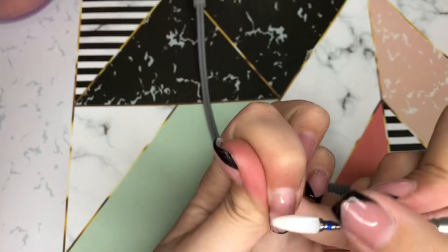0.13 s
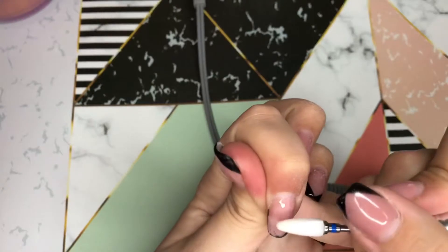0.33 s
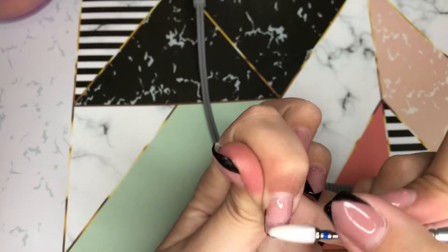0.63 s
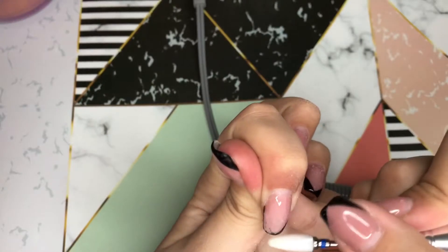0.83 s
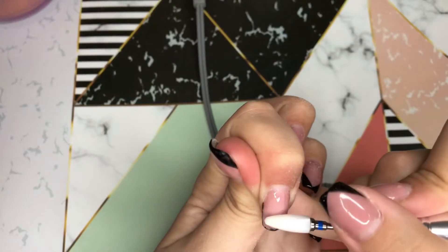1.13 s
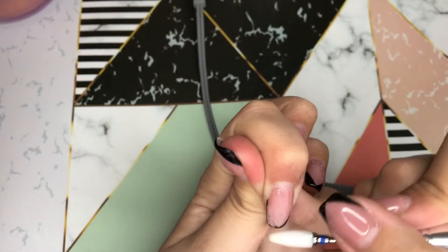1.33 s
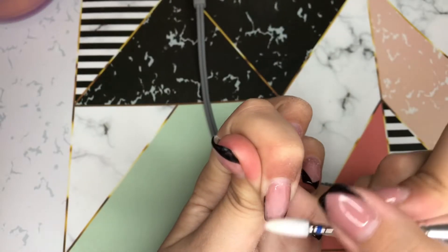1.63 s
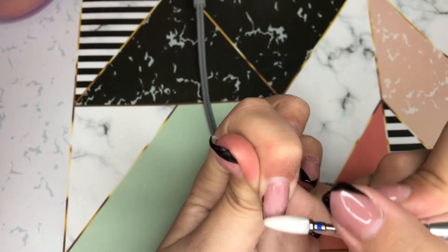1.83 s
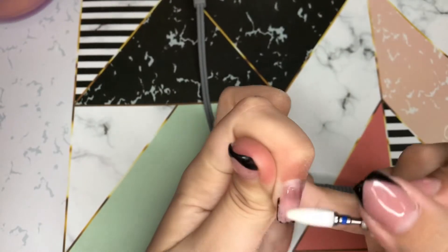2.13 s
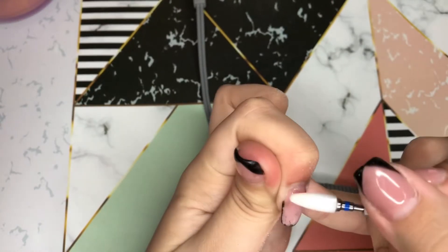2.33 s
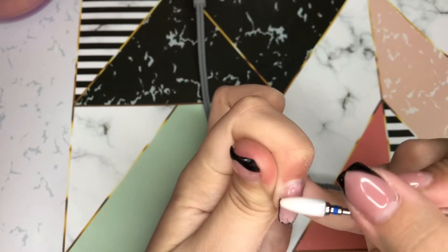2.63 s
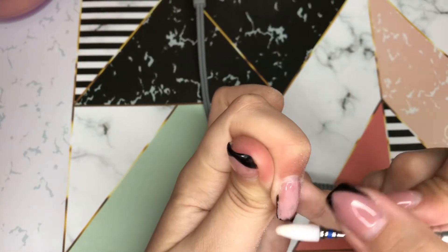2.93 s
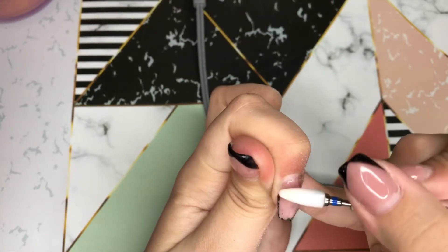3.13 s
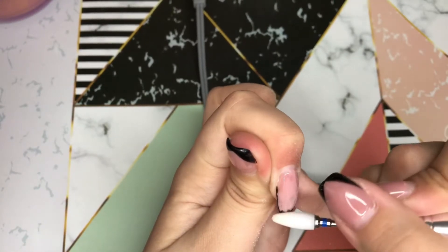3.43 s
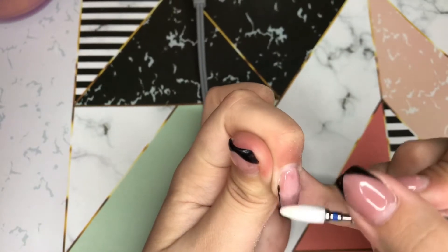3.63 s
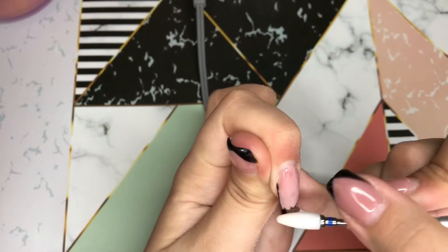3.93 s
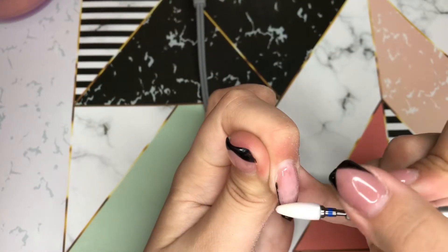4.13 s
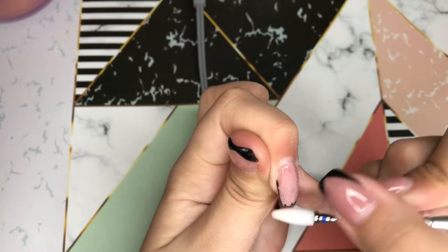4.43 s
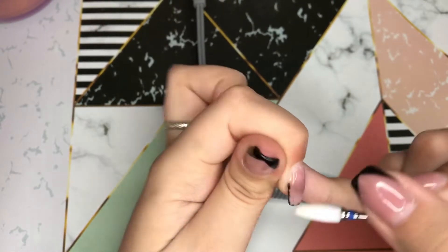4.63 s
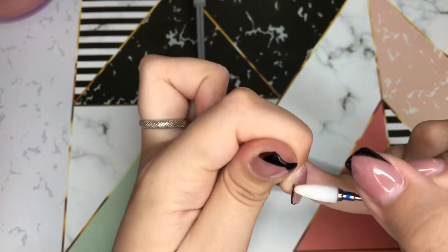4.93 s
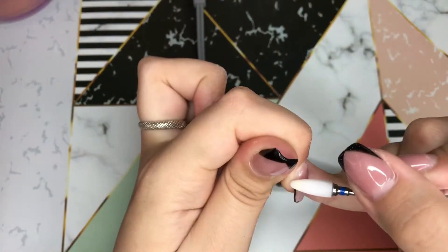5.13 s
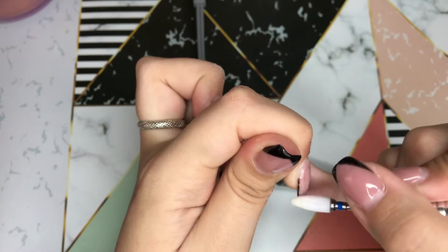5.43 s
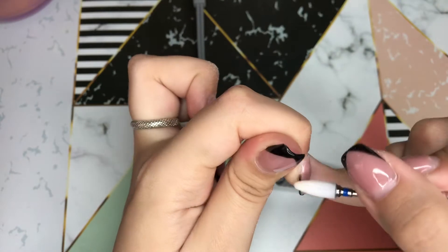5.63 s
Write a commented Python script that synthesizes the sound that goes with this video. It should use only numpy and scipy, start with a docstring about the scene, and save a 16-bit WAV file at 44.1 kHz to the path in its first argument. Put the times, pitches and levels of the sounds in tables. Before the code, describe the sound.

Close up in a quiet indoor room, an electric nail file whirs with a fine, high buzz. The bit grinds on a fingernail in quick, uneven passes, each a scratchy squeal with a hiss of dust. The pitch dips with every press, deepest on the second one, then recovers. Light clicks from the handpiece come in some gaps, and the motor keeps running to the end.

```python
"""Electric nail drill in a quiet room.

The small motor hums on shaft orders and its brushes tick five times a turn. Each stroke on the nail
brakes the shaft, makes the flutes of the bit sing and throws a rasp of dust. The handpiece taps lightly
between strokes. The walls add a short tail over a low room rumble."""
import sys
import numpy as np
from scipy import signal
from scipy.fft import rfft, irfft, next_fast_len
from scipy.io import wavfile
from scipy.ndimage import uniform_filter1d, map_coordinates

SR = 44100
rng = np.random.default_rng(int(sys.argv[2]) if len(sys.argv) > 2 else 0)


def store_wav(level_fs):
    """Save 16-bit WAV to argv[1]."""
    pcm = np.round(np.clip(np.atleast_2d(level_fs), -1, 1) * 32767)
    wavfile.write(sys.argv[1], SR, pcm.T.astype(np.int16))


N = 255339


def amp(db):
    return 10 ** (np.asarray(db) / 20)


def unit_rms(x):
    return x / np.sqrt(np.mean(x ** 2) + 1e-20)


def curve(rows, column):
    """One column of timed rows, a value per sample."""
    rows = np.array(sorted(row[:column + 1] for row in rows))
    return np.interp(np.arange(N) / SR, rows[:, 0], rows[:, column])


def wobble(rate_hz):
    """Smooth random curve through rate_hz Gaussian knots a second."""
    knots = rng.standard_normal(int(N * rate_hz / SR) + 4)
    return map_coordinates(knots, [np.arange(N) * rate_hz / SR])


def coloured(x, spectrum):
    """Minimum-phase filter through (Hz, dB) points on a log frequency axis."""
    hz, db = np.transpose(spectrum)
    gain = amp(np.interp(np.log(np.fft.rfftfreq(4096, 1 / SR) + 1), np.log(hz + 1), db))
    cepstrum = irfft(np.log(gain + 1e-6))
    cepstrum[1:2048] *= 2
    cepstrum[2049:] = 0
    impulse = irfft(np.exp(rfft(cepstrum)))
    size = next_fast_len(N + 8192)
    return irfft(rfft(x, size) * rfft(impulse, size), size)[:N]


FULL_SPEED_HZ, SPIN_UP_TAU_S = 114, .095
# Braked shaft, one list per stroke. Each row: time in seconds, shaft rate in Hz.
BRAKED_SPEED = [
    [(0, 114.2), (.47, 114.4), (.54, 108.5), (.62, 103.5), (.67, 105.2), (.76, 100.8)],
    [(.98, 113), (1.06, 101.5), (1.1, 94), (1.18, 70), (1.22, 61), (1.255, 58), (1.29, 66), (1.35, 94.4)],
    [(1.53, 112.6), (1.58, 108.3), (1.62, 101.5), (1.64, 100.4)],
    [(1.85, 112), (1.925, 97.5)],
    [(2.52, 112.6), (2.63, 103.8), (2.74, 104.6), (2.83, 97.5), (2.85, 97.7)],
    [(3.17, 114.8), (3.23, 108.5), (3.295, 99.3), (3.43, 99.2)],
    [(3.74, 115.4), (3.84, 101)],
    [(4.105, 115), (4.19, 99.9), (4.21, 100.2)],
    [(4.39, 113.7), (4.44, 111.9)],
    [(5.08, 116), (5.14, 111.5), (5.24, 94.5), (5.29, 89), (5.37, 98.5), (5.45, 105.9)],
    [(5.77, 115.4), (5.79, 115.2)],
]
def shaft():
    """Rate in Hz and angle in radians. The bit brakes the motor; freed, it spins up again."""
    t = np.arange(N) / SR
    speed_hz = curve(sum(BRAKED_SPEED, []), column=1)
    for before, after in zip(BRAKED_SPEED, BRAKED_SPEED[1:]):
        (freed_s, slow_hz), (touch_s, fast_hz) = before[-1], after[0]
        gap = (t > freed_s) & (t < touch_s)
        rise = np.expm1((freed_s - t[gap]) / SPIN_UP_TAU_S)
        rise /= np.expm1((freed_s - touch_s) / SPIN_UP_TAU_S)
        speed_hz[gap] = slow_hz + (fast_hz - slow_hz) * rise
    speed_hz = uniform_filter1d(speed_hz, size=441)
    return speed_hz, 2 * np.pi * np.cumsum(speed_hz) / SR


# Shaft orders from 5 up, before speed scaling. Each row: level in dB below full speed, level in dB at it.
HUM_ORDERS = [(-93, -70), (-64.0, -70.5), (-67.5, -63), (-57, -63.5), (-49.5, -59), (-64, -60.5),
              (-57.5, -66), (-55.5, -69), (-62.5, -62.5), (-57.5, -68), (-51.5, -60.5), (-66, -78),
              (-83, -82), (-62, -54), (-52.5, -48.5), (-41.5, -52.5), (-46, -69), (-65.5, -69), (-52, -70),
              (-50, -79), (-56, -94), (-86, -79), (-84, -64), (-68, -85), (-88, -79), (-66, -95)]
# Motor whirr. Each row: frequency in Hz, relative level in dB.
WHIRR_SPECTRUM = [(350, -58), (600, -25.5), (810, -15.5), (1950, -13), (2230, 1), (2550, -15.5), (3300, -8),
                  (4290, -45), (7260, -120)]
def motor_hum(speed_hz, angle):
    """Shaft orders; at full speed their pattern changes, they grow unsteady and the whirr rises."""
    at_full = np.clip((speed_hz - FULL_SPEED_HZ) / .42 + .5, 0, 1)
    orders = np.zeros(N)
    for order, (slow_db, full_db) in enumerate(HUM_ORDERS, 5):
        sway_db = (.7 + at_full) * wobble(14)
        gain = (1 - at_full) * amp(slow_db) + at_full * amp(full_db)
        gain *= (speed_hz / FULL_SPEED_HZ) ** (.8 * order)  # high orders fade first on slowing
        phase = order * angle + rng.uniform(0, 2 * np.pi) + (.15 + .45 * at_full) * wobble(20)
        orders += gain * amp(sway_db) * np.sin(phase)
    whirr_db = -53.5 + 6.4 * at_full + 3.4 * wobble(9)
    whirr = amp(whirr_db) * unit_rms(coloured(rng.standard_normal(N), WHIRR_SPECTRUM))
    return np.sqrt(2) * orders + whirr


def wear(turns, renewal_hz):
    """Roughness of a turning surface: repeats each turn while it is gradually renewed."""
    age = np.cumsum(renewal_hz) / SR
    marks = rng.standard_normal((int(age[-1]) + 4, 360))
    return unit_rms(map_coordinates(marks, [age, turns % 1 * 360], mode="grid-wrap"))


# Ticks of one turn. Each row: position as a share of the turn, relative level in dB.
COMMUTATOR_TICKS = [(0, -2.5), (.27, 3.5), (.51, 3), (0.713, -3.5), (0.799, -11)]
# Brush loudness at full speed. Each row: time in seconds, level in dB before a fixed lift.
BRUSH_LEVELS = [(0, -39.5), (.45, -41), (.8, -39.5), (2.0, -39), (2.5, -38.5), (4.25, -39.5), (5.05, -37.5),
                (5.5, -38.5), (5.79, -38)]
# Housing response. Each row: frequency in Hz, relative gain in dB.
HOUSING_RESPONSE = [(1710, -36.5), (2900, -12), (3250, -17), (3510, -9.5), (4070, -12), (4400, -5.5),
                    (5030, -7), (6090, -3), (7220, -7.5), (7740, -17), (9640, -9.5), (10600, -18.5),
                    (11700, -14), (13200, -14.5), (15700, -18)]
def brushes(speed_hz, angle, lift_db=4, db_per_hz=.06, sway_db=.8):
    """Brushes tick on the commutator gaps; after each tick they rub on worn copper and spark."""
    turns = angle / (2 * np.pi)
    whole_turns = np.arange(1, int(turns[-1]) - 1)
    ticks = np.zeros(N + 1)
    for share, db in COMMUTATOR_TICKS:
        jitter, strength = rng.standard_normal((len(whole_turns), 2)).T
        position = np.interp(whole_turns + share, turns, np.arange(N)) + .8 * jitter
        sample, fraction = position.astype(int), position % 1
        gain = amp(db + 1.3 * strength + 1.5 * wobble(5)[sample])
        ticks += np.bincount(sample, gain * (1 - fraction), N + 1)
        ticks += np.bincount(sample + 1, gain * fraction, N + 1)
    decay = np.exp(-np.arange(400) / (.0012 * SR))
    rub_envelope = unit_rms(np.convolve(ticks, decay)[:N]) + .7
    copper = wear(turns, renewal_hz=np.where(speed_hz > FULL_SPEED_HZ, 24, 7))
    sparks = .8 * rng.standard_normal(N)
    source = .55 * unit_rms(ticks[:N]) + unit_rms(rub_envelope * (copper + sparks))
    level_db = curve(BRUSH_LEVELS, column=1) + lift_db + db_per_hz * (speed_hz - FULL_SPEED_HZ)
    return amp(level_db + sway_db * wobble(12)) * unit_rms(coloured(source, HOUSING_RESPONSE))


# Wall response. Each row: frequency in Hz, gain in dB.
WALL_RESPONSE = [(500, 6), (4000, -2), (12000, -12)]
def walls(x, t60_s=.2):
    """Short diffuse reflection from table and walls, which swallow the treble."""
    t = np.arange(SR // 4) / SR
    tail = unit_rms(rng.standard_normal(len(t)) * amp(-60 * t / t60_s)) / np.sqrt(len(t))
    return coloured(signal.fftconvolve(x, tail)[:N], WALL_RESPONSE)


# Room rumble. Each row: frequency in Hz, relative level in dB.
ROOM_SPECTRUM = [(12, -44), (20, -26), (59, 3), (155, -7), (202, -5), (487, -15.5), (560, -22), (730, -20),
                 (1230, -120)]
def room_tone(level_db=-60.5):
    """Low, steady rumble of the room."""
    return amp(level_db + .7 * wobble(5.17)) * unit_rms(coloured(rng.standard_normal(N), ROOM_SPECTRUM))


LAND_S, LIFT_S = .006, .008
# Bit on the nail, one list per stroke. Each row: time in seconds, flute drive in dB,
# fine over coarse flutes in dB, rasp drive in dB.
NAIL_STROKES = [
    [(0.472, -28.5, 3, -38), (0.498, -23, -11, -28), (0.522, -29.5, -10, -31), (0.544, -21.5, -16, -28),
     (0.584, -24.5, 0, -31.5), (0.61, -21, 20, -24), (0.656, -29, 2, -35), (0.678, -26.5, 5, -27.5),
     (0.758, -18.5, 22, -30.5), (0.77, -32, 10, -37)],
    [(0.985, -25.5, -12, -26), (1.047, -20.5, 10, -30), (1.095, -17.5, 18.5, -27.5), (1.2, -24.5, 25, -24),
     (1.266, -35, 15, -24.5), (1.288, -29.5, 17, -27), (1.31, -34, -2, -30)],
    [(1.532, -26.5, 5, -32), (1.568, -32.5, 18, -29.5), (1.598, -20, -11, -25), (1.63, -27, 4, -27),
     (1.66, -33, -2, -30.5)],
    [(1.857, -26.5, 1, -25), (1.889, -24, -3, -26), (1.921, -27, 5, -24.5), (1.94, -31, -4, -27)],
    [(2.515, -36.5, 3, -44), (2.581, -31, 8, -35), (2.621, -30, -6, -29), (2.66, -34, -5, -32.5),
     (2.735, -29, -8, -28), (2.784, -24, 12, -24.5), (2.824, -24, 13, -25.5), (2.858, -40, -2, -32)],
    [(3.173, -35, -6, -36), (3.229, -29.5, 11, -31), (3.247, -30, -5, -28.5), (3.281, -22, 10, -27),
     (3.31, -28, 4, -26.5), (3.406, -31, 13, -26), (3.447, -31.5, 0, -31)],
    [(3.734, -30, 2, -33.5), (3.78, -24, 9.5, -26), (3.8, -31, 7, -26), (3.83, -21.5, 20, -24.5),
     (3.856, -32, 1, -31)],
    [(4.108, -27, -4, -32), (4.134, -24, 17, -26.5), (4.156, -27, 3, -29.5), (4.178, -19.5, 26, -25.5),
     (4.211, -21.5, 9, -27.5)],
    [(4.394, -35, -0.5, -32), (4.402, -25, -1, -28), (4.425, -26, 1, -30.5)],
    [(5.074, -28.5, 11, -37), (5.12, -32.5, 3, -33), (5.146, -28.5, 20, -34.5), (5.2, -35, 5, -32),
     (5.264, -25, 24, -30), (5.298, -29.5, 5, -28), (5.329, -22.5, 20, -30.5), (5.425, -23, 19, -32),
     (5.47, -40, 8, -41)],
    [(5.775, -41, 0, -37), (5.789, -43, 2.5, -33)],
]
def stroke_curve(column):
    """One stroke control per sample; the drives fall silent while the bit is off the nail."""
    landings = [(rows[0][0] - LAND_S, -90, rows[0][2], -90) for rows in NAIL_STROKES]
    lifts = [(rows[-1][0] + LIFT_S, -90, rows[-1][2], -90) for rows in NAIL_STROKES]
    return curve(sum(NAIL_STROKES, []) + landings + lifts, column)


def flutes(speed_hz, angle):
    """Two crossing sets of flutes sing with overtones and a sum tone. Also returns the fine set's phase."""
    drive, fine_ratio = amp(stroke_curve(column=1)), amp(stroke_curve(column=2))
    coarse_gain = drive / np.hypot(1, fine_ratio)
    fine_gain = coarse_gain * fine_ratio
    fine_phase = 20 * angle + .48 * wobble(120)
    coarse_phase = 14 * angle + .45 * wobble(120)
    harshness = amp(-16 + .28 * (FULL_SPEED_HZ - speed_hz) + 3.1 * wobble(80))  # a braked bit cuts deeper
    overtones = np.sin(2 * fine_phase + .9 * wobble(200)) + .8 * np.sin(3 * fine_phase)
    tones = fine_gain * (np.sin(fine_phase) + harshness * overtones)
    tones += coarse_gain * (np.sin(coarse_phase) + amp(-6) * np.sin(2 * coarse_phase))
    sum_gain = np.sqrt(fine_gain * coarse_gain) * amp(-6 + 3 * wobble(60))
    tones += sum_gain * np.sin(fine_phase + coarse_phase + .6 * wobble(150))
    return tones, fine_phase


# Grip, stroke by stroke. Each row: dust over rasp drive in dB at the start, the same at the end,
# landing bounce from 0 to 1, its time constant in seconds.
STROKE_GRIP = [(-9.5, 9, 0.79, 0.13), (-2, -1, 0.6, 0.043), (-2, 2.5, 0.8, 0.028), (3, 4, 0.1, .04),
               (-14, 0.5, 0.17, 0.25), (-14.5, 7, .25, .1), (5.5, 4, 0.2, 0.027), (9, 5.5, 0, .05),
               (10.5, 6.5, 0, .05), (-3, -10, 0.2, 0.72), (-6, -3, 0, .05)]
def grip():
    """Dust over rasp glides through each stroke; the bounce settles after landing."""
    t, dust_db, bounce = np.arange(N) / SR, np.zeros(N), np.zeros(N)
    for rows, (start_db, end_db, landing_bounce, settle_s) in zip(NAIL_STROKES, STROKE_GRIP):
        start_s, end_s = rows[0][0], rows[-1][0]
        landed = t > start_s - LAND_S
        dust_db[landed] = np.interp(t[landed], [start_s, end_s], [start_db, end_db])
        bounce[landed] = landing_bounce * np.exp((start_s - t[landed]) / settle_s)
    return dust_db, bounce


def runout(angle, bounce):
    """The bit is out of round: bouncing, it touches once a turn; pressed hard, it stays on the nail."""
    depth = .12 + 2.4 * np.clip(bounce, 0, 1)
    starts = np.array([round(rows[0][0] * SR) for rows in NAIL_STROKES])
    stroke_index = np.maximum(np.searchsorted(starts, np.arange(N)) - 1, 0)
    phase = angle - angle[starts][stroke_index] - 1.2 + .097 * wobble(33)
    return np.exp(depth * np.cos(phase)) / np.sqrt(np.i0(2 * depth))  # unit rms over a turn


def chips(bite, spectrum, flicker_db):
    """Noise that bursts as each tooth bites."""
    bursts = bite * amp(flicker_db * wobble(400)) * rng.standard_normal(N)
    return unit_rms(coloured(bursts, spectrum))


# Rasp and dust hiss. Each row: frequency in Hz, relative level in dB.
RASP_SPECTRUM = [(290, -73), (500, -39.5), (904, -27), (1130, -24.5), (1440, -13.5), (1780, -13),
                 (2030, -6.5), (3100, -17.5), (3500, -10), (4000, -7.5), (4700, -11.5), (8500, -17.5),
                 (11000, -26), (18700, -120)]
DUST_SPECTRUM = [(4120, -39.5), (7000, -9.5), (8460, -4), (11000, -9), (11600, -3.5), (12900, 0),
                 (15700, -11.5)]
# Response of nail and finger. Each row: frequency in Hz, gain in dB.
NAIL_RESPONSE = [(500, -21), (1100, -2.5), (2000, -0.5), (2500, 1.5), (3150, -12.5), (3750, 4), (4400, -6),
                 (5800, 1), (9000, -18)]
def grinding(speed_hz, angle):
    """Flute tones coloured by nail and finger, plus rasp and dust, all pulsed by the bit's contact."""
    tones, fine_phase = flutes(speed_hz, angle)
    dust_db, bounce = grip()
    contact = runout(angle, bounce)
    bite = (1 + .4 * np.sin(fine_phase)) * contact ** .35
    rasp_db = stroke_curve(column=3)
    rasp = amp(rasp_db - 1.05) * chips(bite, RASP_SPECTRUM, flicker_db=2)
    dust = amp(rasp_db + dust_db - .36) * chips(bite, DUST_SPECTRUM, flicker_db=1.36)
    singing = np.sqrt(2) * tones * contact * amp(-2.2 + 2.2 * wobble(70))
    return coloured(singing, NAIL_RESPONSE) + rasp + dust


# Handpiece taps. Each row: start in seconds, level in dB before a fixed lift.
HANDPIECE_TAPS = [(0.835, -35), (1.372, -30), (2.0507, -35), (2.9997, -31), (3.621, -36), (3.9608, -33),
                  (4.3172, -30)]
def taps(lift_db=10, attack_s=.00068, t60_s=.0082):
    """Each tap of the handpiece is a short dull ring of two modes."""
    out, t = np.zeros(N + 2000), np.arange(2000) / SR
    modes = np.sin(2 * np.pi * 1700 * t) + .5 * np.sin(2 * np.pi * 1350 * t)
    envelope = (1 - np.exp(-t / attack_s)) * amp(-60 * t / t60_s)
    for start_s, db in HANDPIECE_TAPS:
        out[round(start_s * SR):][:len(t)] += amp(db + lift_db) * envelope * modes
    return out[:N]


def scene():
    """Drill, reflections and room tone, the same on both channels."""
    speed_hz, angle = shaft()
    drill = motor_hum(speed_hz, angle) + brushes(speed_hz, angle) + grinding(speed_hz, angle) + taps()
    return np.tile(drill + amp(-10) * walls(drill) + room_tone(), (2, 1))


TOP_HZ = 15800
def record(dry):
    """Brick-wall low-pass at TOP_HZ."""
    size = next_fast_len(N + 4096)
    passband = np.fft.rfftfreq(size, 1 / SR) < TOP_HZ
    return irfft(rfft(dry, size) * passband, size)[:, :N]


dry = scene()
out = record(dry)
store_wav(out)
```